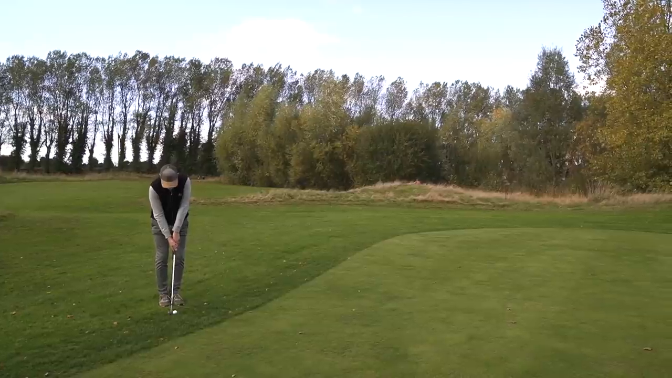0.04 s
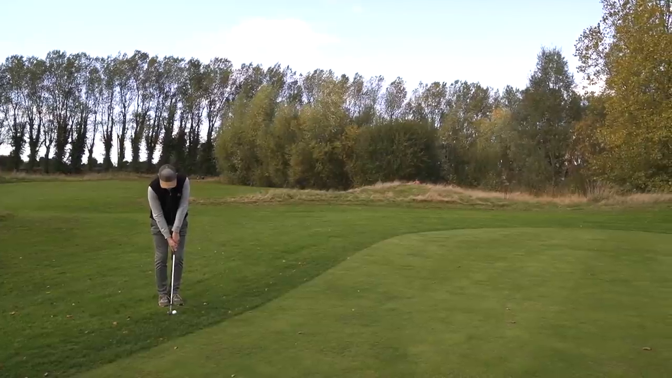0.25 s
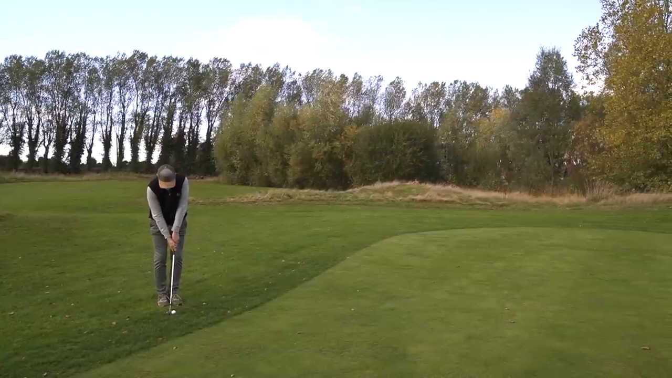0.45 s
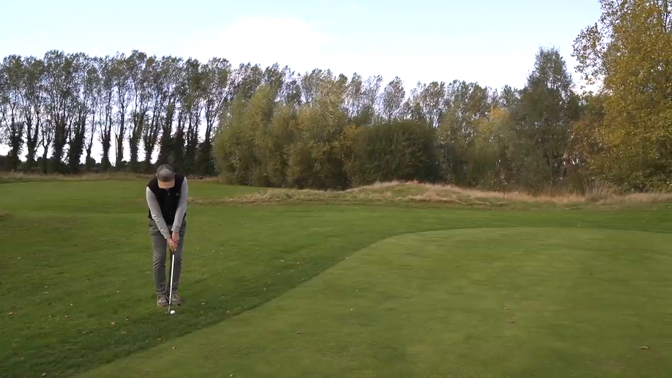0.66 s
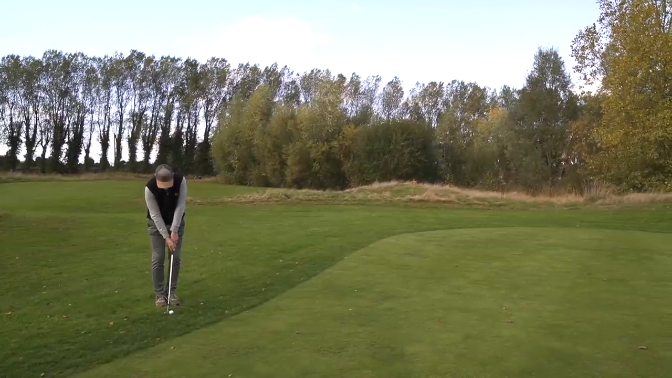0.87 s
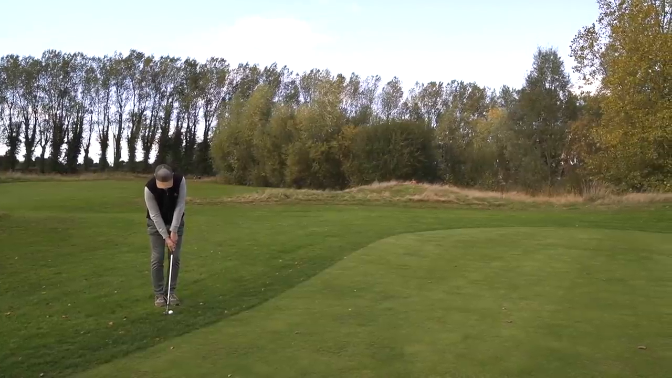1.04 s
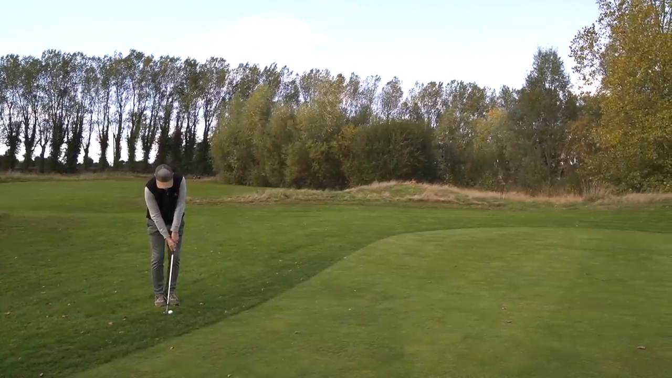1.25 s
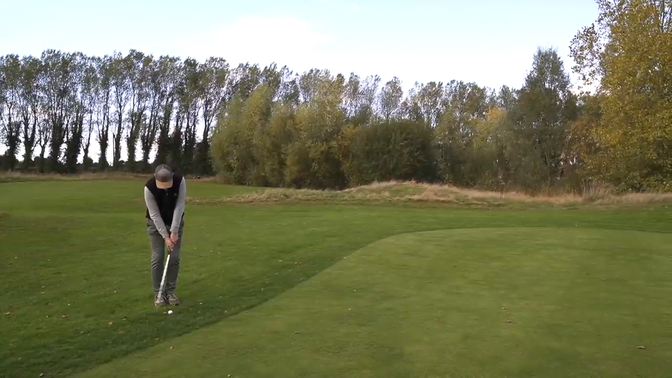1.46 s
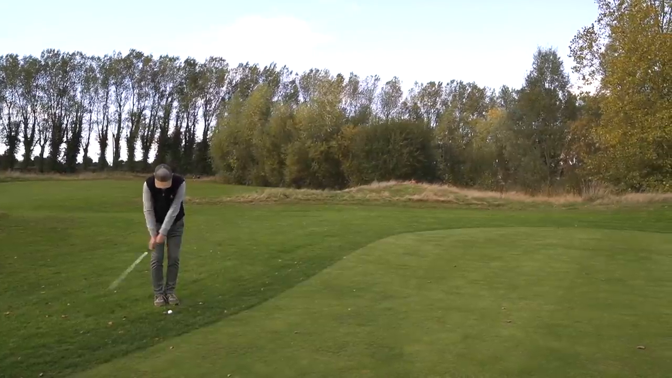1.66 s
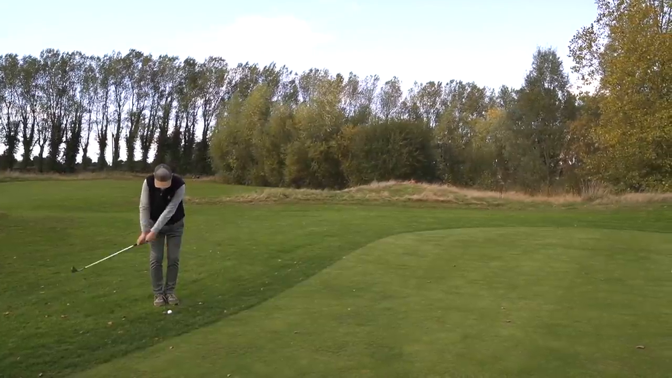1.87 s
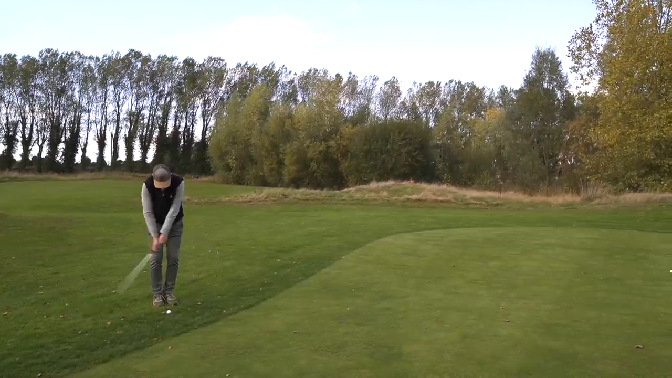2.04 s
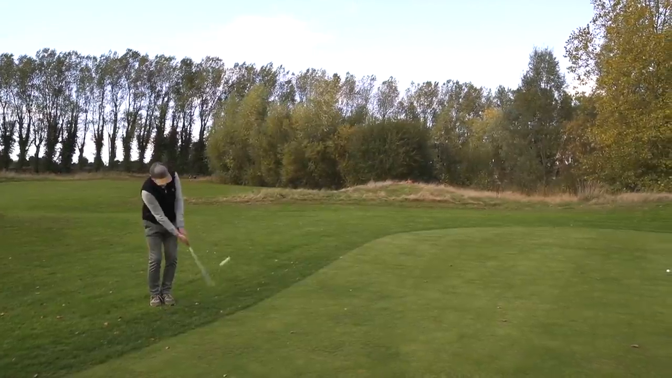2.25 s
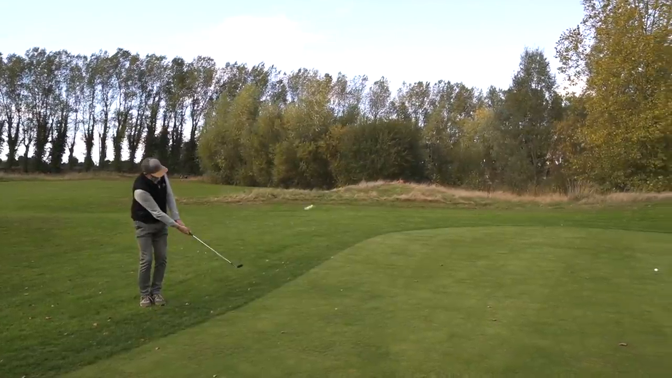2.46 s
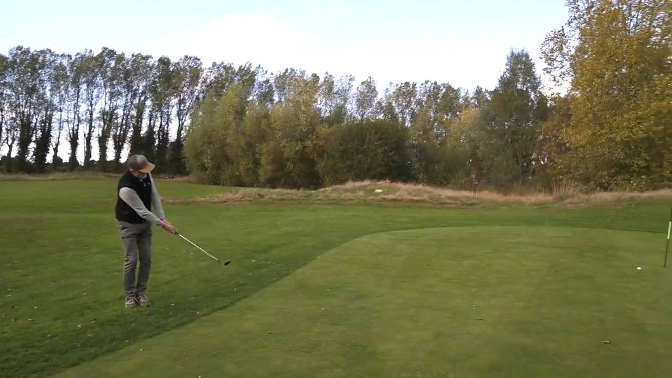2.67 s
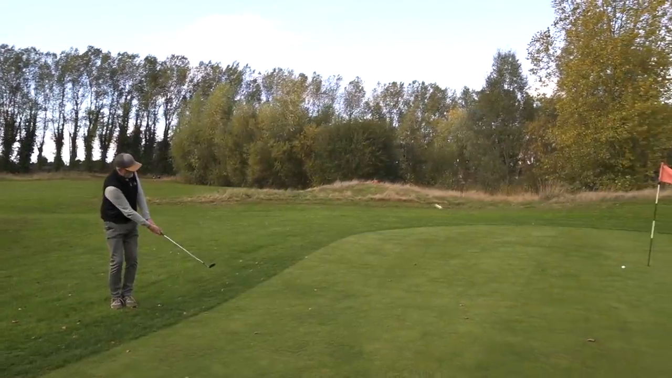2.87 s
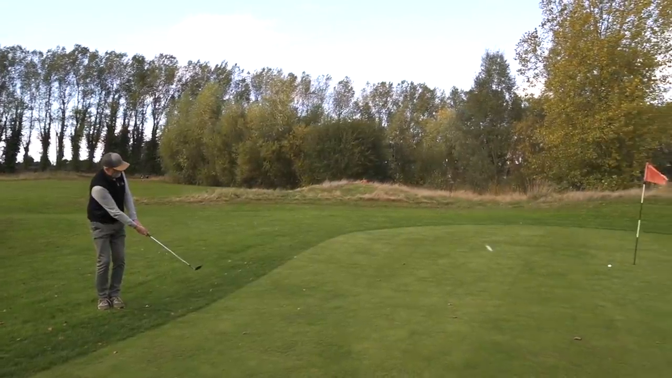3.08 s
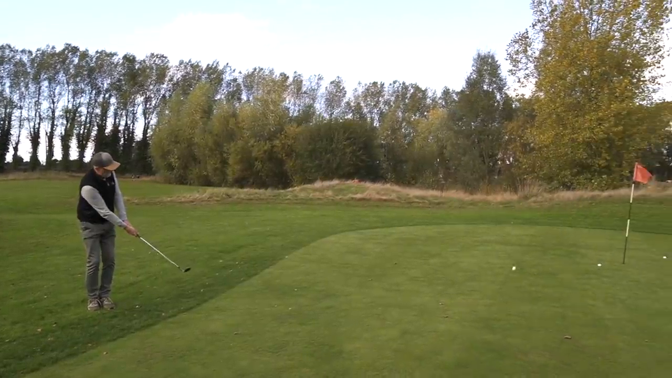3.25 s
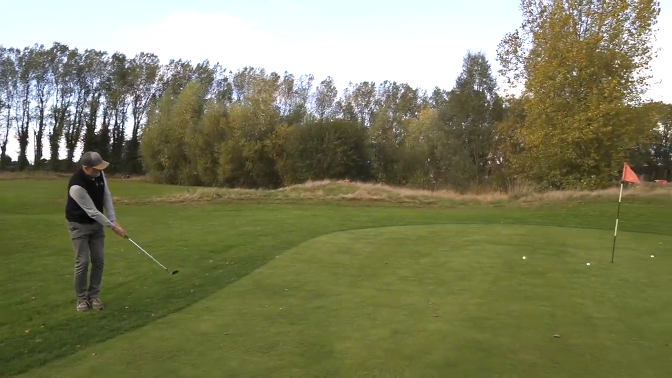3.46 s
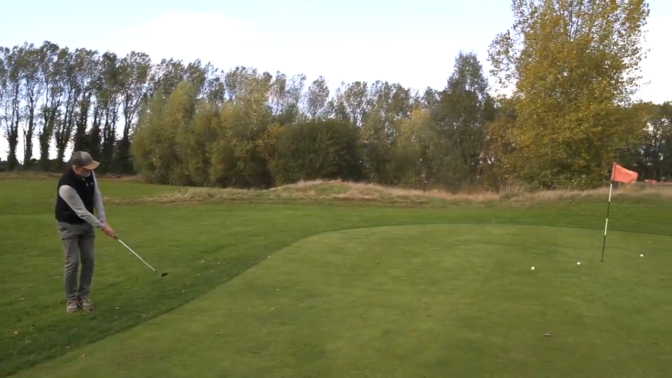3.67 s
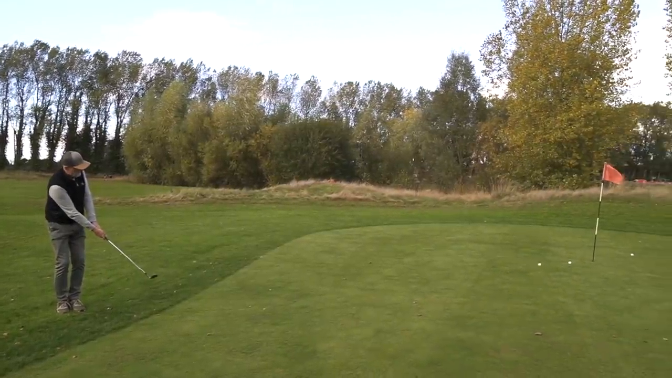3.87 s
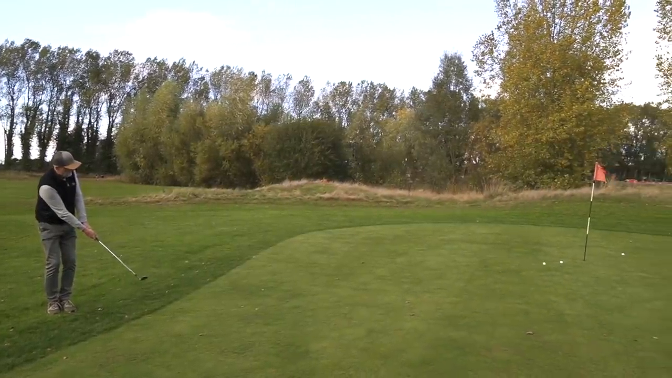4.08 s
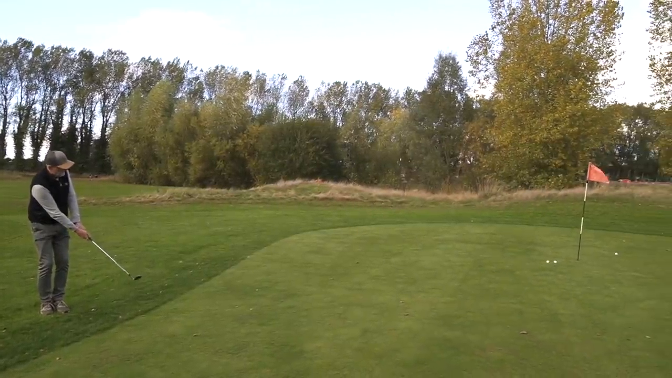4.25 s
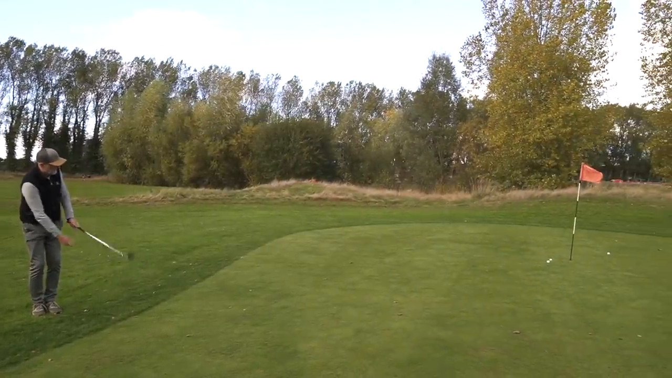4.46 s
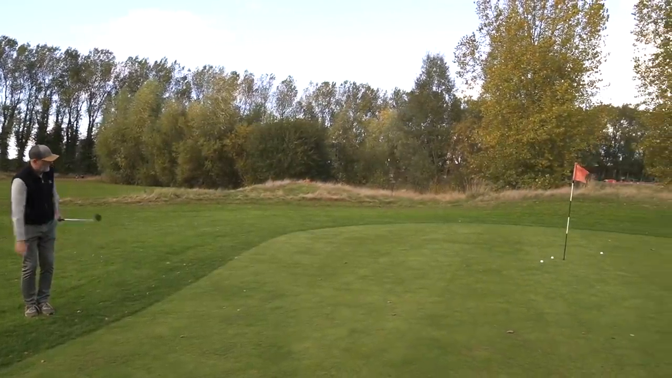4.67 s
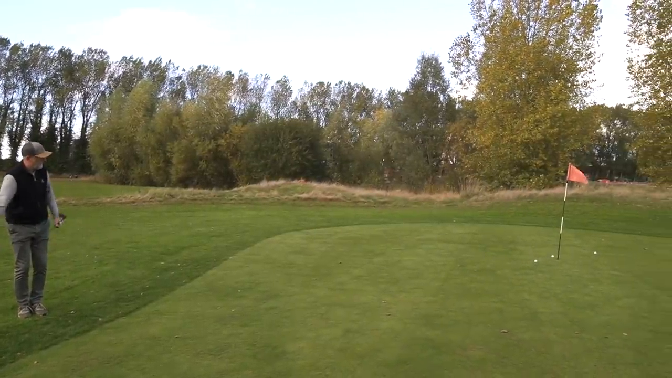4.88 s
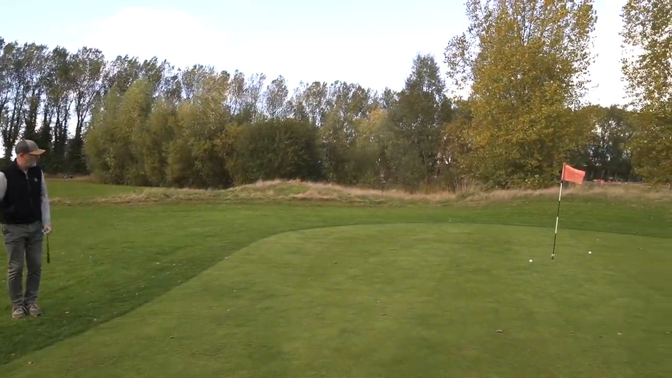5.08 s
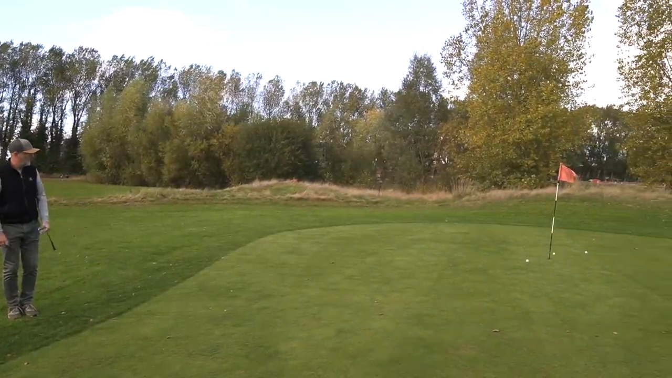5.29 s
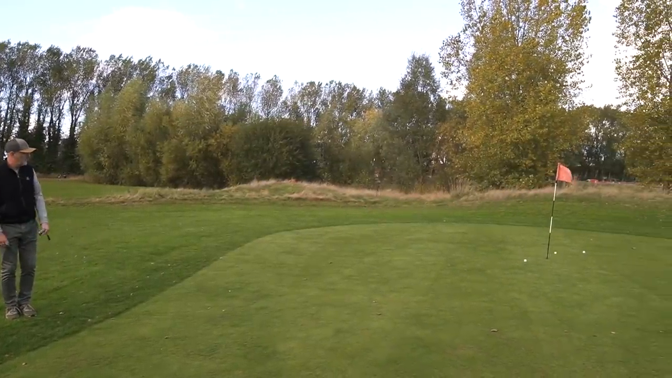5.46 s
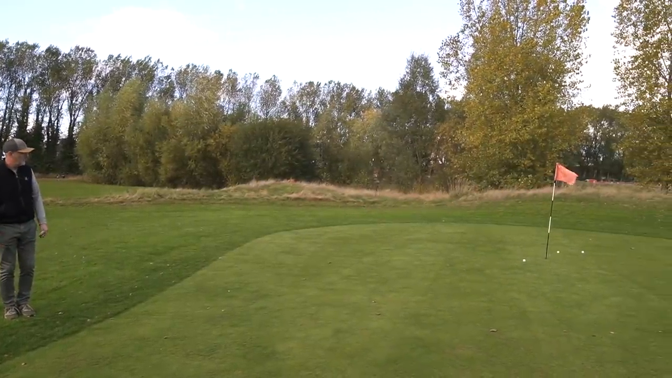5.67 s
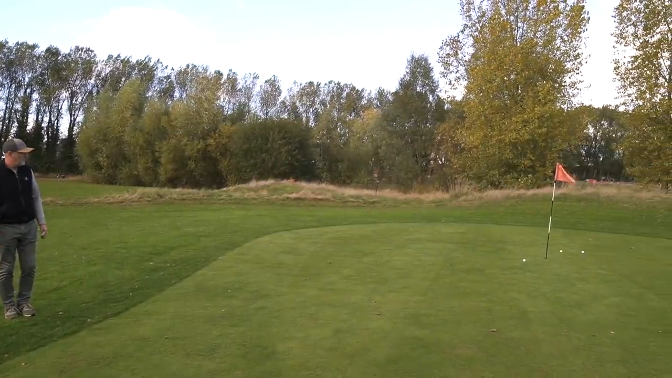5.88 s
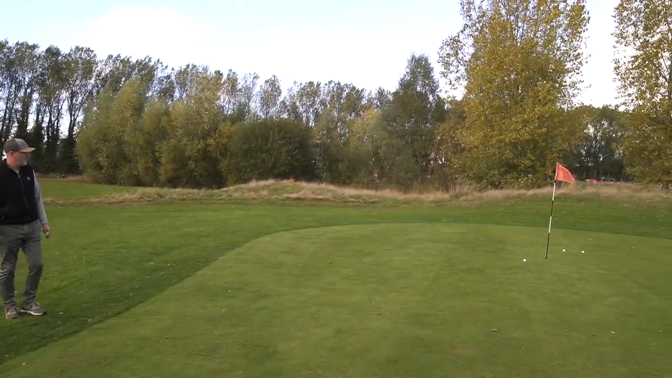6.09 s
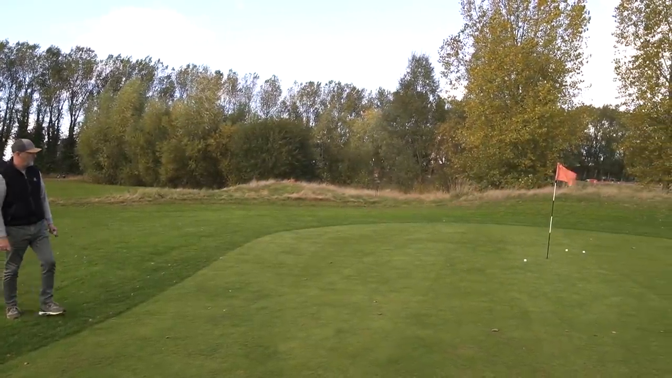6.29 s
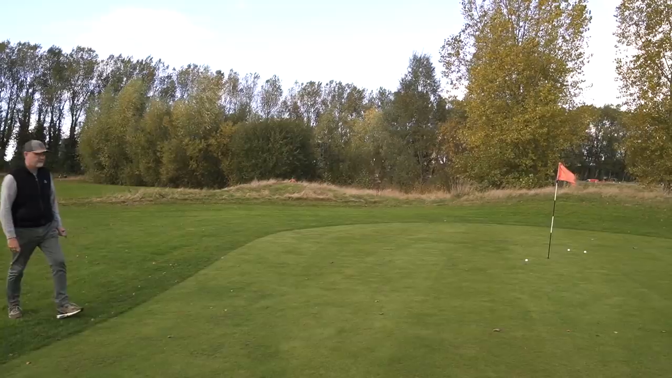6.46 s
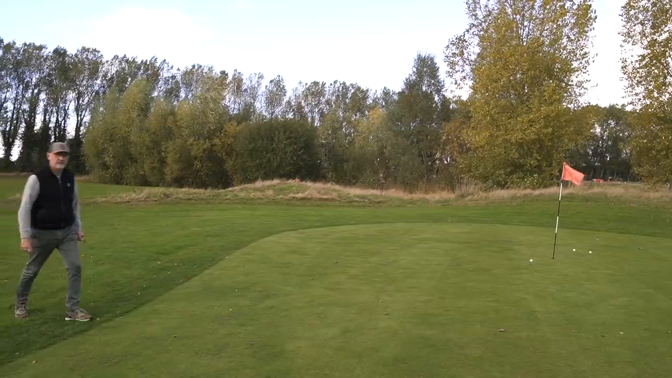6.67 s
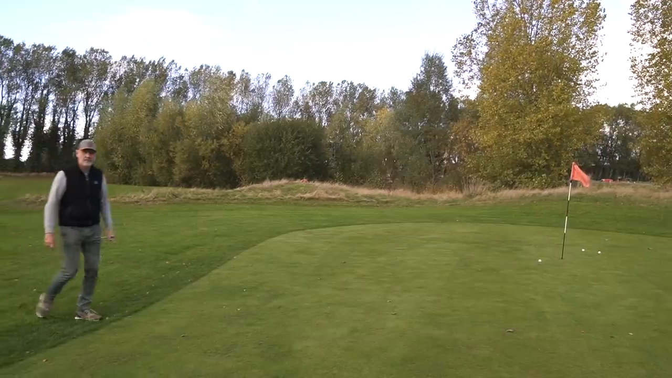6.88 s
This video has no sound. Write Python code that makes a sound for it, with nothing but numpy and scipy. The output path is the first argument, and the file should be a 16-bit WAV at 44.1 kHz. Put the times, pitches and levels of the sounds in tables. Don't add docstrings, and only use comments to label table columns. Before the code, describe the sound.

Close microphone on a padded vest: cloth rustles, a loud chip strike, faint turf thumps, wind murmuring in far trees, more rustling and knocks.

```python
import sys
import numpy as np
from scipy import signal
from scipy.fft import rfft, irfft
from scipy.io import wavfile
from scipy.ndimage import uniform_filter1d

SR = 44100
rng = np.random.default_rng(int(sys.argv[2]) if len(sys.argv) > 2 else 0)


def transcribe(signal):
    frames = np.atleast_2d(signal).T
    limited = np.clip(frames, -1, 1)
    pcm = np.round(limited * 32767).astype(np.int16)
    wavfile.write(sys.argv[1], SR, pcm)


def ratio(d):
    e = np.asarray(d, float) / 20
    return 10 ** e


N = 305613


def shape(points, hz):
    point_hz, level_db = np.transpose(points)
    return np.interp(np.log(hz + 1), np.log(point_hz), level_db, left=-60, right=-60)


def unit(x):
    return x / np.sqrt(np.mean(x ** 2))


def walk(rate_hz):
    hold = int(SR / rate_hz)
    steps = np.repeat(rng.standard_normal(N // hold + 1), hold)
    slewed = uniform_filter1d(uniform_filter1d(steps, hold), hold)
    return unit(slewed[:N])


def bands(source, points, shared_db, own_db, rate_hz):
    hz = np.fft.rfftfreq(N, 1 / SR)
    spectrum = rfft(source) * ratio(shape(points, hz))
    out = 0
    near = walk(rate_hz)
    for centre in np.arange(8, 29):
        share = np.clip(1 - np.abs(2 * np.log2(hz + 1) - centre), 0, 1)
        near = unit(near + walk(rate_hz) / 2)
        swell = ratio(shared_db * near + own_db * walk(2 * rate_hz))
        out = out + irfft(spectrum * share, N) * swell
    return unit(out)


def ring(modes, rise_s):
    t = np.arange(SR // 5) / SR
    body = 0
    for hz, db, t60_s in modes:
        body = body + ratio(db - 60 * t / t60_s) * np.sin(2 * np.pi * hz * t)
    body = body * (1 - np.exp(-t / rise_s))
    return body / np.abs(body).max()


def add(out, sound, start_s, level_db):
    i = int(start_s * SR)
    out[i:i + len(sound)] += ratio(level_db) * sound[:N - i]


# pitch_hz, level_db (per Hz)
HISS_COLOUR = [(1000, -3), (4000, 4), (10000, -2.5), (16000, -2)]


def hiss():
    hz = np.fft.rfftfreq(N, 1 / SR)
    noise = rfft(rng.standard_normal(N)) * ratio(shape(HISS_COLOUR, hz))
    return ratio(-73.5) * unit(irfft(noise, N))


# time_s, level_db
BREEZE = [
    (0.0, -57.5),
    (1.2, -56.5),
    (1.72, -51),
    (2.3, -57.5),
    (2.51, -49),
    (4.05, -51.5),
    (4.3, -49),
    (5.1, -53),
    (5.36, -47),
    (6.93, -43),
]


def breeze_db():
    time_s, level_db = np.transpose(BREEZE)
    return np.interp(np.arange(N) / SR, time_s, level_db)


# pitch_hz, level_db (per Hz)
TREE_COLOUR = [(25, -13), (60, -4.5), (130, -11.5), (250, -13), (370, -10.5), (520, -13.5), (800, -11.5),
               (1050, -17.5), (1500, -28), (2200, -31), (4500, -47), (5500, -40), (7000, -45), (16000, -59)]


def trees():
    murmur = bands(rng.standard_normal(N), TREE_COLOUR, shared_db=0.71, own_db=1.3, rate_hz=3.0)
    return ratio(breeze_db() + 2.5) * murmur


def slips(lo_hz, hi_hz, size_db, count):
    sizes = np.minimum(rng.exponential(size=N // count + 1), 4)
    noise = rng.standard_normal(N) * ratio(size_db * np.repeat(sizes, count)[:N])
    hz = np.fft.rfftfreq(N, 1 / SR)
    return irfft(rfft(unit(noise)) * (hz >= lo_hz) * (hz < hi_hz), N)


# peak_s, rustle_db, rise_s, fall_s, brightness_db
MOVES = [(1.42, -76, 0.42, 0.46, -7), (1.72, -56.5, 0.46, 0.42, -8), (1.85, -56, 0.33, 0.071, -7),
         (2.1, -53, 0.17, 0.31, -7), (2.19, -50, .2, 0.28, -4.5), (2.196, -52, .025, .015, 6),
         (2.222, -54, 0.047, 0.036, 8), (2.32, -63, 0.16, 0.32, -15), (2.58, -62, 0.24, 0.18, -5.5),
         (4.36, -60.5, 0.23, 0.36, -6.5), (4.55, -49.5, 0.34, 0.56, -7.5), (4.72, -53, 0.51, 0.23, -11),
         (4.94, -52, 0.38, 0.46, -7.5), (5.09, -51, 0.47, 0.49, -8.5), (5.33, -58, .5, 0.19, -6),
         (5.39, -62.5, .2, .06, 0), (5.65, -59, 0.39, 0.55, -9), (5.93, -52.5, 0.45, 0.45, -8.5),
         (6.3, -59.5, 0.66, 0.57, -16), (6.45, -57, 0.37, .3, -11), (6.57, -57, 0.36, 0.17, -7),
         (6.71, -45, 0.13, 0.11, -7), (6.8, -47.5, 0.13, 0.17, -6.5), (6.87, -51.5, 0.045, 0.035, -5)]


def motion():
    peak_s, rustle_db, rise_s, fall_s, bright_db = np.transpose(MOVES)[:, :, None]
    clock = np.arange(0, N, 32)
    late_s = clock / SR - peak_s
    distance = np.where(late_s < 0, -late_s / rise_s, late_s / fall_s)
    moves = ratio(2 * (rustle_db - 20 * distance))
    moving = moves.sum(axis=0)
    still = ratio(2 * (-71 + 1.7 * np.minimum(breeze_db()[clock] + 50, 0)))
    power = still + moving
    bright = (still * -4 + (moves * bright_db).sum(axis=0)) / power
    buffet = ratio(2 * -55) + ratio(2 * 12.5) * moving
    levels_db = 10 * np.log10(power), bright, 10 * np.log10(buffet)
    return [np.interp(np.arange(N), clock, level_db) for level_db in levels_db]


# pitch_hz, level_db (per Hz)
RUSTLE_COLOUR = [(120, -31), (200, -0.5), (294, -11.5), (334, -2), (373, -5), (635, -7.5), (1080, -12.5),
                 (1350, -12.5), (2090, -16), (3560, -22.5), (10500, -37), (15100, -47.5), (16000, -47)]
# pitch_hz, level_db (per Hz)
BUFFET_COLOUR = [(20, -15), (40, 1), (70, 0), (130, -2), (220, -5.5), (400, -18)]


def cloth():
    rustle_db, bright_db, buffet_db = motion()
    crackle = slips(0, 1800, 2.58, count=60)
    crackle = crackle + slips(1800, 6080, 2.14, count=24)
    crackle = crackle + slips(5920, SR, 3.3, count=10)
    rustle = bands(crackle, RUSTLE_COLOUR, shared_db=1.0, own_db=0.7, rate_hz=12.0)
    treble = signal.sosfilt(signal.butter(2, 7000, "high", fs=SR, output="sos"), rustle)
    rustle = rustle + (ratio(bright_db + 11.5) - 1) * treble
    lumps = rng.standard_normal(N) * ratio(1.2 * walk(30.0))
    buffet = bands(lumps, BUFFET_COLOUR, shared_db=1.3, own_db=0.54, rate_hz=8.0)
    return ratio(rustle_db + 12.0) * rustle + ratio(buffet_db) * buffet


def jolts(out, table, cycles, push, rebound_s, rebound_db):
    for peak_s, level_db, pitch_hz in table:
        length_s = cycles / pitch_hz
        lead = int(3 * length_s * SR)
        t = np.arange(-lead, lead) / SR
        width_s = np.where(t < 0, .52, .62) * length_s
        lump = np.exp(-(t / width_s) ** 2)
        lump = 1.15 * push * lump * np.cos(2 * np.pi * pitch_hz * t - 1.1)
        start_s = peak_s - lead / SR
        add(out, lump, start_s, level_db)
        add(out, lump, start_s + rebound_s, level_db + rebound_db)


# peak_s, level_db, pitch_hz
THUDS = [(1.55, -33, 143), (1.645, -32, 189), (1.6768, -27.5, 118), (1.7273, -14, 137), (1.765, -27, 75),
         (1.817, -27, 159), (2.0413, -34, 134), (2.1435, -23.5, 141), (2.238, -24.5, 70),
         (2.292, -28.5, 65), (2.3263, -28.5, 252), (2.3582, -29.5, 104), (2.3893, -31, 135),
         (4.6136, -25, 129), (4.696, -28, 110), (4.7035, -22, 58), (4.9355, -24.5, 111), (5.0775, -24, 132),
         (5.3086, -23.5, 145), (5.6714, -25, 151), (5.7764, -28, 154), (5.8545, -24.6, 155),
         (5.8968, -26.9, 227), (5.9763, -26.5, 274), (6.2111, -32.5, 111), (6.7034, -26, 229),
         (6.7163, -22.5, 148), (6.8595, -17, 78), (6.8722, -15, 200), (6.882, -25, 60)]
# peak_s, level_db, pitch_hz
KNOCKS = [(.4062, -46, 861), (1.6583, -33, 696), (1.762, -24.2, 845), (2.0094, -33.5, 1287),
          (2.1782, -29, 775), (2.2653, -34, 854), (2.2918, -36, 990), (2.3252, -36.5, 738),
          (2.4545, -38, 800), (4.2795, -30.5, 780), (4.7445, -30, 1400), (4.7865, -16, 1020),
          (4.797, -24.3, 1199), (6.6953, -26, 730), (6.8091, -24.3, 1180), (6.8689, -17.5, 900)]
# peak_s, level_db, pitch_hz
TICKS = [(.0783, -51, 4930), (.4064, -50, 2799), (1.7597, -38.9, 3983), (1.9866, -41, 4114),
         (2.0973, -35, 4281), (2.1212, -35, 3021), (2.2641, -40.3, 3718), (4.2787, -44, 3217),
         (4.7337, -29, 3963), (4.738, -35, 4600), (4.7475, -36, 3000), (4.7443, -30, 4337),
         (4.786, -26.5, 3220), (5.1342, -43, 3029), (5.1817, -36, 4220), (5.3388, -39.9, 3810),
         (5.4003, -42, 3790), (6.1335, -39, 4500), (6.1835, -29.5, 2680), (6.1837, -32, 5200),
         (6.2343, -41, 4402), (6.2695, -40, 4487), (6.7141, -34, 3384), (6.7723, -34.6, 2939),
         (6.8006, -33, 3747), (6.869, -21, 3550)]
# peak_s, level_db, pitch_hz
SNAPS = [(1.7892, -41, 8604), (1.8422, -43.6, 11911), (1.9222, -50.1, 9990), (1.9552, -47, 9410),
         (2.2275, -39.1, 8458), (2.2913, -33, 11678), (2.085, -44, 8500), (5.6738, -42, 8893),
         (5.9239, -43, 9203), (6.1835, -44, 8825), (6.2343, -45.8, 8363), (6.4411, -39, 8623),
         (6.5789, -40, 9926), (6.7267, -35, 7907), (6.7957, -35.3, 11318), (6.8696, -33, 9910)]
# peak_s, level_db
STITCHES = [(4.8638, -48), (4.9132, -49), (4.9556, -46), (4.9815, -50), (4.997, -45), (5.0608, -48),
            (5.1337, -49), (5.1806, -45), (5.2, -51), (5.2414, -54), (5.2968, -51), (5.3227, -48),
            (5.3362, -45), (5.3806, -58), (5.3956, -46), (5.5318, -55), (5.633, -58), (5.9224, -50),
            (6.0611, -51), (6.1823, -55), (6.4257, -55), (6.4936, -54), (6.5774, -51), (6.6447, -51),
            (6.6682, -47)]


def knocks(out):
    jolts(out, THUDS, cycles=0.7, push=-0.94, rebound_s=0.0136, rebound_db=-22.0)
    jolts(out, KNOCKS, cycles=0.86, push=1, rebound_s=.0022, rebound_db=-11.0)
    clasp = ring([(493, 9, 0.016), (1190, -7, 0.034), (1700, -7.0, 0.04)], rise_s=0.00068)
    for peak_s, level_db, _ in KNOCKS:
        add(out, clasp, peak_s, level_db - 10.5)
    jolts(out, TICKS, cycles=1.14, push=1, rebound_s=.0009, rebound_db=-8.0)
    jolts(out, SNAPS, cycles=2, push=0.89, rebound_s=0.00065, rebound_db=-20.0)
    stitches = [(peak_s, level_db + 4, 13000) for peak_s, level_db in STITCHES]
    jolts(out, stitches, cycles=1.6, push=0.9, rebound_s=0.0005, rebound_db=-14.0)


# start_s, thump_db, slap_db
BOUNCES = [
    (3.2693, -30, -25),
    (3.7285, -33, -41),
]
# pitch_hz, level_db, t60_s
THUMP = [(195, 5, 0.062)]
# pitch_hz, level_db, t60_s
SLAP = [(439, 1, 0.023), (900, -17, .02)]


def bounces(out):
    for start_s, thump_db, slap_db in BOUNCES:
        add(out, ring(THUMP, rise_s=.005), start_s + .0007, thump_db)
        add(out, -ring(SLAP, rise_s=0.0017), start_s, slap_db)
        add(out, ring([(330, 0, .02)], rise_s=.001), start_s + .0112, slap_db - 3.0)


# pitch_hz, level_db (per Hz)
FACE_COLOUR = [(150, -42), (300, -14), (600, 1.5), (1530, 2.5), (1800, 0), (2160, -5), (2330, -30),
               (2700, -36), (3200, -30), (4200, -50)]
# late_s, share (of the click, negative is inverted)
STRIKE_ECHOES = [
    (.00224, -.2),
    (.00553, .1),
    (.0092, .035),
]
# pitch_hz, level_db, t60_s
HEAD_MODES = [(3280, -5, 0.011), (3920, -4, 0.0069), (4770, -7.5, 0.01), (5640, -12, 0.016),
              (6280, -12, 0.013), (7700, -7.5, 0.0082), (9100, -12, 0.0054), (11500, -8, 0.0054),
              (12100, -15, 0.0085)]


def strike(out):
    hz = np.fft.rfftfreq(2048, 1 / SR)
    spread = .07
    phase = -4 * np.pi * spread * np.sqrt(hz) + .8
    click = irfft(ratio(shape(FACE_COLOUR, hz)) * np.exp(1j * phase))
    click = np.roll(click, SR // 500)[:800] / np.abs(click).max()
    for late_s, share in [(0, 0.91)] + list(STRIKE_ECHOES):
        add(out, share * click, 2.19392 + late_s, -1.0)
    add(out, ring(HEAD_MODES, rise_s=0.00045), 2.1982, -19)


def scene():
    out = trees() + cloth()
    knocks(out)
    bounces(out)
    strike(out)
    return out[None]


def band_limit(x):
    return signal.sosfilt(signal.butter(12, 16470, fs=SR, output="sos"), x)


def record(dry):
    top_cut = signal.ellip(8, .2, 60, 15800, fs=SR, output="sos")
    mix = signal.sosfilt(top_cut, dry + hiss())
    return band_limit(mix)


dry = scene()
out = record(dry)
transcribe(out)
```